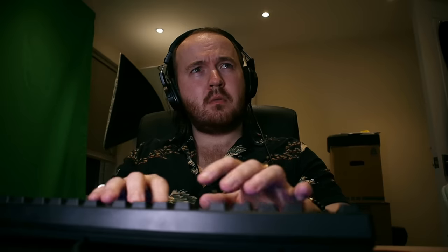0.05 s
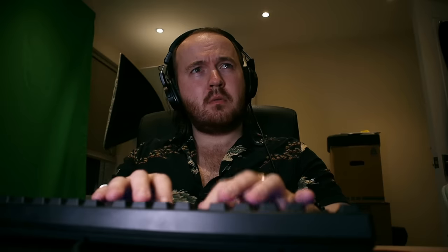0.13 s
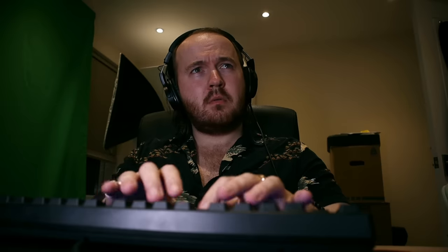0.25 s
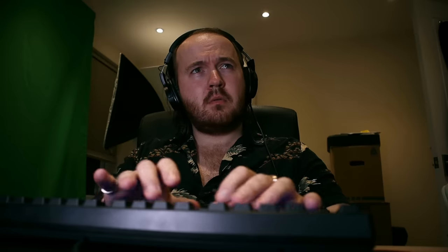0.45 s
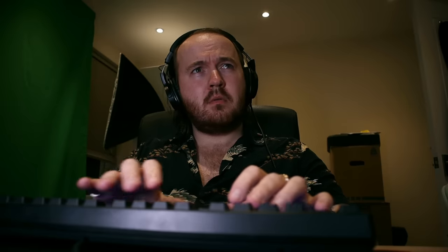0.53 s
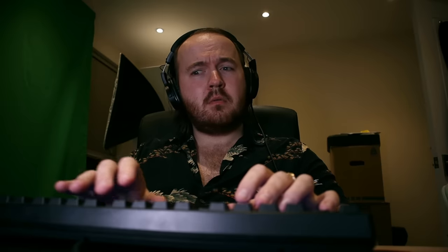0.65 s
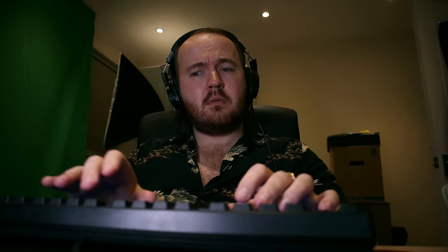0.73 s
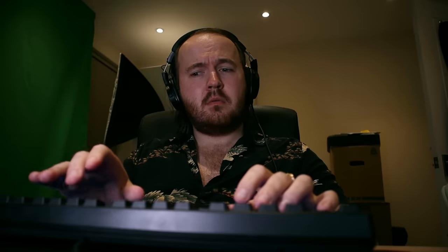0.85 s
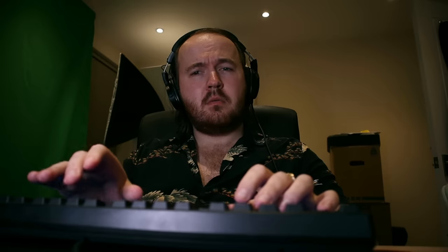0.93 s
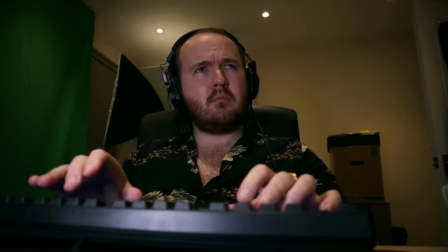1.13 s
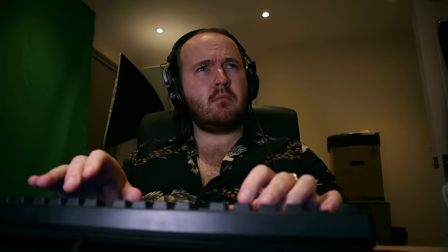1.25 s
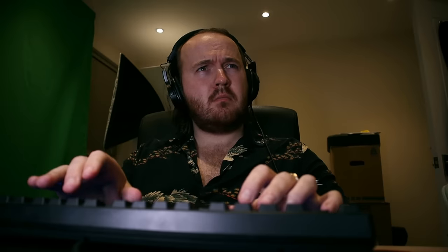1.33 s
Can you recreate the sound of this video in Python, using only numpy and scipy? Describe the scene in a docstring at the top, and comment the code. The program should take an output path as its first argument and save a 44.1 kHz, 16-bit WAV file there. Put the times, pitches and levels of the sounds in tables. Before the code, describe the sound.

Two computer keyboard keys are pressed and released in quick succession, each with a plastic clack and a slight desk thump. Then only a faint low hum and fan noise remain, heard close up in a small room.

```python
"""Two computer keyboard keys, pressed and released in quick succession, close by on a desk in a small room.
Each key ticks under the finger, clacks at the bottom of its travel and clicks on its way back up.
The contacts ring the keycap and the case; the firmer ones knock the hollow case and thump the desk.
Low electrical hum, faint fan noise and a deep rumble run underneath."""
import sys
import numpy as np
from scipy import signal
from scipy.fft import rfft, irfft
from scipy.io import wavfile

SR = 44100
rng = np.random.default_rng(int(sys.argv[2]) if len(sys.argv) > 2 else 0)


def log_audio(samples):
    """Write samples as a 16-bit WAV file to the path given in sys.argv[1]."""
    # one column per channel
    frames = np.atleast_2d(samples).T
    # limit to full scale, then quantise
    limited = np.clip(frames, -1, 1)
    pcm = np.round(limited * 32767).astype(np.int16)
    wavfile.write(sys.argv[1], SR, pcm)


N = 61739
T = np.arange(N) / SR
FREQS = np.maximum(np.arange(N // 2 + 1) * SR / N, 1)

# Keycap modes: pitch_hz, width_hz, down_db, up_db
FIRST_KEY_MODES = [(1350, 290, -10, -12.5), (2200, 460, -11, -9.5), (2970, 260, 1, -5),
                   (3620, 300, 1, -9.5), (4450, 470, -1.5, -8.5), (5400, 800, -10.5, -11),
                   (6150, 600, -12, -11.5), (8040, 700, -19, -12.5), (8550, 300, -15.5, -12.5),
                   (9550, 760, -17, -19.5), (12000, 1500, -31.5, -29)]
SECOND_KEY_MODES = [(1244, 200, -33, 4.5), (2250, 640, -20.5, -5.5), (2946, 380, -0.5, 5.5),
                    (3600, 590, -11, -5), (4400, 390, -7.5, -7), (5890, 360, -11, -13.5),
                    (6250, 600, -14.5, -14.5), (7500, 500, -21, -15), (8600, 300, -11.5, -5.5),
                    (9380, 500, -18.5, -23.5), (11500, 2000, -32.5, -32.5)]
# Key contacts: start_s, level_db, key_index, going_up, purity, room_db
KEY_CONTACTS = [(0.0432, -25, 0, 0, 0.81, -11), (.1980, -9, 0, 0, 2.3, 9), (.2000, 7.5, 0, 0, 2.43, -3),
                (0.205, 12, 0, 0, 1.0, 2.5), (0.216, 1, 0, 0, 1.35, -6), (0.2176, 0, 0, 0, 1.4, -17),
                (0.311, 1.5, 0, 1, 1.0, -4), (.3210, -14.5, 1, 1, 1.0, -5), (0.3555, 11, 1, 0, 1.8, 4),
                (0.3667, 16, 1, 0, 1.05, -6.5), (0.4396, -10, 1, 0, 1.6, 7), (0.4456, -4.5, 1, 0, 1.44, -9),
                (.4546, 1.5, 1, 1, 0.67, -3.5), (0.4602, -7.5, 1, 1, 1.24, -29)]
def keys(room_purity=0.64):
    """Each contact clicks, rings the case and sounds in the room from its own key's position."""
    key_modes = [FIRST_KEY_MODES, SECOND_KEY_MODES]
    responses = [room_response() + case_ring() for _ in key_modes]
    out = 0
    for start_s, level_db, key, going_up, purity, room_db in KEY_CONTACTS:
        direct = keycap(key_modes[key], going_up, purity)
        # The room gathers sound from all sides of the key, evening out its modes.
        diffuse = keycap(key_modes[key], going_up, purity * room_purity)
        tail = signal.fftconvolve(diffuse, responses[key][:SR // 2])
        out += from_db(level_db) * (delayed(direct, start_s) + from_db(room_db) * delayed(tail, start_s))
    return out


# Plastic bounces: interval_s, strength
BOUNCES = [(.00031, 0.54), (.00078, 0.39)]
def keycap(modes, going_up, purity, base_low_cut_hz=600, top_hz=13400):
    """A struck keycap rings for milliseconds and chatters; purity above 1 favours its strongest modes."""
    click = sum((-1) ** k * from_db(purity * (up_db if going_up else down_db)) * resonance(hz, width_hz)
                for k, (hz, width_hz, down_db, up_db) in enumerate(modes))
    low_cut_hz = base_low_cut_hz * purity ** 2  # a small part radiates little bass
    click = signal.sosfilt(signal.butter(2, low_cut_hz, "high", fs=SR, output="sos"), click)
    click = signal.sosfilt(signal.butter(3, top_hz, fs=SR, output="sos"), click)
    for interval_s, strength in BOUNCES:
        allpass = np.r_[np.tanh(strength), np.zeros(int(interval_s * SR)), 1]
        click = signal.lfilter(allpass, allpass[::-1], click)
    return click


# Long-ringing case modes: pitch_hz, level_db, t60_s
CASE_MODES = [(1140, -16.5, .11), (2170, -8, .16), (2130, -8.5, .16), (2385, -6, 0.12), (2603, -6.5, 0.17),
              (2780, -14, .16), (2997, -20, .16), (3457, -14.5, .14), (3618, -22, 0.21), (3713, -12, .12),
              (4150, -14, .14), (4463, -19.5, .15), (4770, -19.5, 0.15)]
def case_ring():
    """The keyboard case rings on after a contact."""
    ring = sum(from_db(db) * resonance(hz, np.log(1000) / np.pi / t60_s) for hz, db, t60_s in CASE_MODES)
    return np.pad(ring, (0, N - len(ring)))


# Hollow case modes: pitch_hz, width_hz, level_db
KNOCK_MODES = [(720, 120, -11.5), (898, 83, 0.5), (1110, 130, 0), (1420, 150, -6)]
# Blows to the case: start_s, level_db
CASE_BLOWS = [(0.2074, 0.5), (.3130, -12), (0.3698, -6.5), (.4558, -6.5)]
def case_knocks():
    """Firmer contacts give the hollow case a short, dull knock."""
    knock = sum((-1) ** k * from_db(db) * resonance(hz, width_hz)
                for k, (hz, width_hz, db) in enumerate(KNOCK_MODES))
    return sum(from_db(db) * delayed(knock, start_s) for start_s, db in CASE_BLOWS)


# Desk modes: pitch_hz, level_db, t60_s
DESK_MODES = [(112.3, 4.5, 0.064), (126.94, 2, 0.12), (149.8, -11, .15), (200.3, -15.5, 0.1923),
              (220.6, -29, 0.254), (328.5, -34.5, 0.21)]
# Jolts to the desk: start_s, thump_db, sway_db, going_up (1 swings the desk the other way, as a release does;
# the jolt at .34 s is a finger landing on the second key)
DESK_JOLTS = [(.2060, -12, -18, 0), (0.2378, -33, -42.5, 0), (.3120, -37, -46.5, 1), (.3400, -32.5, -49, 1),
              (0.3691, -16, -28, 0), (0.4554, -27, -39, 1)]
def desk(sway_hz=61, sway_t60_s=0.19, lag_s=0.0072, rise_s=0.0091):
    """The desk swings and rings just after each jolt; releases, and the finger landing on the second key, swing
    it the other way."""
    thump = sum(from_db(db) * decay(t60_s) * np.sin(2 * np.pi * hz * T) for hz, db, t60_s in DESK_MODES)
    sway = -decay(sway_t60_s) * np.sin(2 * np.pi * sway_hz * T)
    rise = 1 - np.exp(-(T / rise_s) ** 2)
    out = 0
    for start_s, thump_db, sway_db, going_up in DESK_JOLTS:
        motion = rise * (from_db(thump_db) * thump + from_db(sway_db) * sway)
        out += (-1 if going_up else 1) * delayed(motion, start_s + lag_s)
    return out


# Room reverberation: freq_hz, level_db, t60_s
ROOM_BANDS = [(300, 2, .35), (700, -5.5, .3), (1200, -1, 0.19), (1740, -8, 0.19), (2440, -2.5, 0.19),
              (3200, -12, 0.28), (4840, -8.5, .22), (6790, -13.5, .22), (9400, -13.5, 0.207),
              (15030, -16, .19)]
def room_response(onset_s=0.008):
    """Diffuse reflections build quickly and die away band by band."""
    white = rfft(rng.standard_normal(N))
    onset = 1 - np.exp(-(T / onset_s) ** 2)
    edges_hz = np.geomspace(250, 17000, 25)
    out = 0
    for low_hz, high_hz in zip(edges_hz, edges_hz[1:]):
        centre_hz = np.sqrt(low_hz * high_hz)
        band = irfft(white * ((FREQS >= low_hz) & (FREQS < high_hz)), N)
        band *= onset * decay(at_hz(ROOM_BANDS, centre_hz, column=2))
        gain = from_db(at_hz(ROOM_BANDS, centre_hz)) * np.sqrt(2 * (high_hz - low_hz) / SR / N)
        out += gain * unit_rms(band)
    return out


# Hum lines: pitch_hz, level_db, waver_depth
HUM_LINES = [(119.5, -48, 0.071), (241, -76.5, .4), (328, -76, .6), (623, -79, 0.537), (1240, -87.5, 0.28)]
def hum(waver_hz=7):
    """Electrical hum; each line wavers in level and phase."""
    out = 0
    for hz, db, depth in HUM_LINES:
        phase = 2 * np.pi * hz * T
        in_phase = (1 + depth * drift(waver_hz)) * np.sin(phase)
        quadrature = depth * drift(waver_hz) * np.cos(phase)
        out += from_db(db) * np.sqrt(2) * (in_phase + quadrature)
    return out


# Fan spectrum: freq_hz, density_db
FAN_SPECTRUM = [(88, -37), (150, 3.5), (244, -0.5), (274, -12), (332, -7), (530, -18.5), (631, -15.5),
                (668, -17.5), (966, -21), (2230, -29), (3550, -28.5), (5330, -33.5), (15500, -35)]
def fan(level_db=-62.5, low_cut_hz=160):
    """Faint broadband fan noise."""
    gains = from_db(at_hz(FAN_SPECTRUM, FREQS)) / np.sqrt(1 + (low_cut_hz / FREQS) ** 8)
    return from_db(level_db) * noise(gains)


# Rumble spectrum: freq_hz, density_db
RUMBLE_SPECTRUM = [(8, -6.5), (14, 7.5), (25, -19), (45, -22), (65, -16), (90, -8.5), (135, -7.5),
                   (170, -19.5), (260, -46.5)]
def rumble(level_db=-51):
    """Deep band-limited noise."""
    in_band = (FREQS > RUMBLE_SPECTRUM[0][0]) & (FREQS < RUMBLE_SPECTRUM[-1][0])
    return from_db(level_db) * noise(from_db(at_hz(RUMBLE_SPECTRUM, FREQS)) * in_band)


# Background envelope: time_s, gain_db
BACKGROUND_GAIN = [(0, -2.5), (.5, 7.5), (.585, -3), (.63, -1.5), (.73, 0.5), (1.0, 0), (1.4, -2)]
def background():
    """Hum, fan and rumble swell together, dip briefly and settle."""
    gain_db = np.interp(T, *np.transpose(BACKGROUND_GAIN))
    return (hum() + fan() + rumble()) * from_db(gain_db)


def resonance(hz, width_hz):
    """Struck mode with a spectral peak gain of 1."""
    t = T[:SR // 4]
    envelope = np.exp(-np.minimum(np.pi * width_hz * t, 100))
    return 2 * np.pi * width_hz / SR * envelope * np.sin(2 * np.pi * hz * t)


def decay(t60_s):
    """Exponential fall, 60 dB in t60_s."""
    return np.exp(-np.minimum(np.log(1000) * T / t60_s, 100))


def noise(gains):
    """Spectrally shaped noise, rms 1."""
    return unit_rms(irfft(rfft(rng.standard_normal(N)) * gains, N))


def drift(rate_hz):
    """Slow random wander, rms 1."""
    return noise(1 / (1 + (FREQS / rate_hz) ** 4))


def delayed(x, start_s):
    """Place x at start_s in N samples."""
    return np.concatenate([np.zeros(int(start_s * SR)), x, np.zeros(N)])[:N]


def at_hz(table, hz, column=1):
    """Interpolate a column over log frequency."""
    table = np.array(table)
    return np.interp(np.log(hz), np.log(table[:, 0]), table[:, column])


def from_db(db):
    """Decibels to gain."""
    return 10 ** (np.asarray(db) / 20)


def unit_rms(x):
    """Scale to rms 1."""
    return x / np.sqrt(np.mean(x ** 2) + 1e-20)


def scene():
    """Keys, case, desk and background in mono."""
    return (keys() + case_knocks() + desk() + background())[None]


def record(dry, cutoff_hz=15750):
    """Steep low-pass."""
    return signal.sosfilt(signal.ellip(10, 0.2, 80, cutoff_hz, fs=SR, output="sos"), dry)


dry = scene()
out = record(dry)
log_audio(out)
```